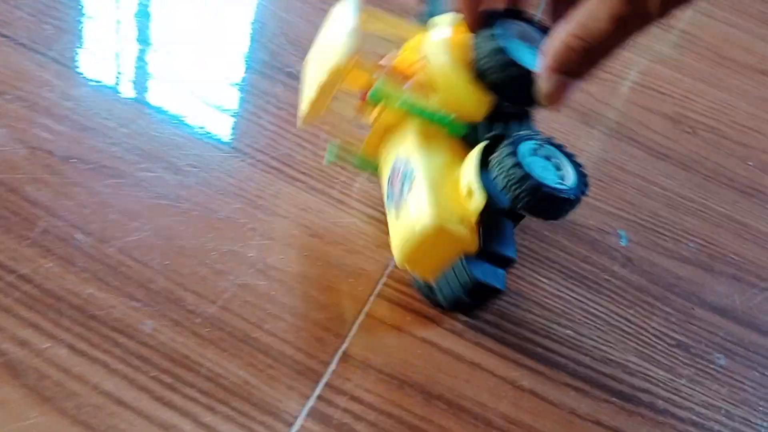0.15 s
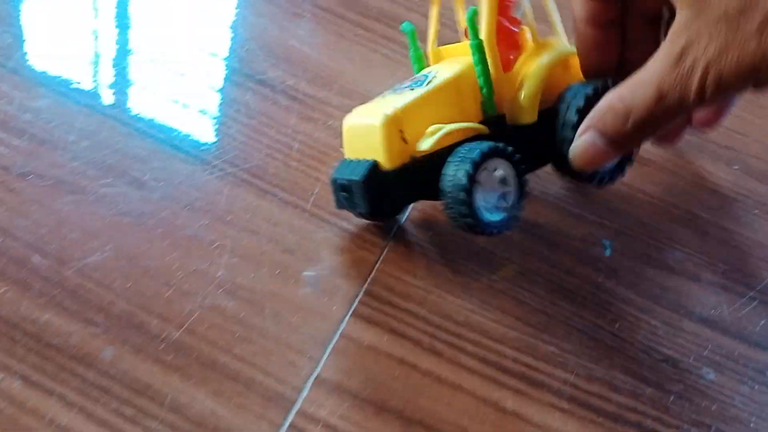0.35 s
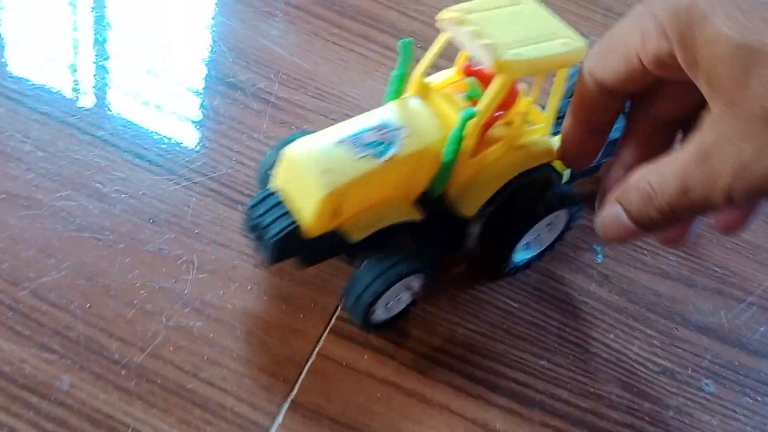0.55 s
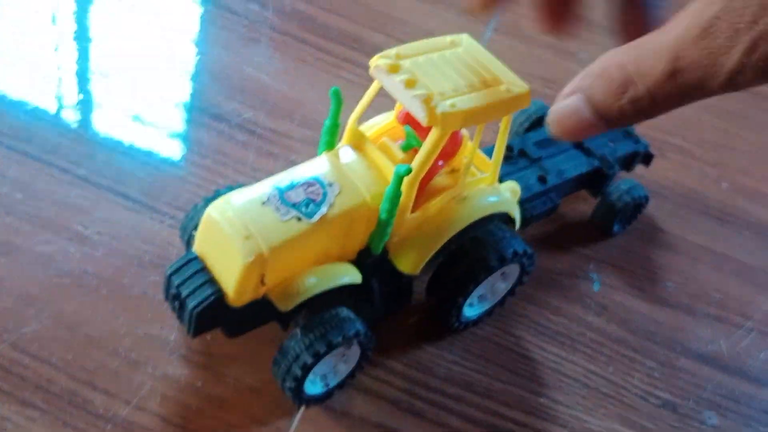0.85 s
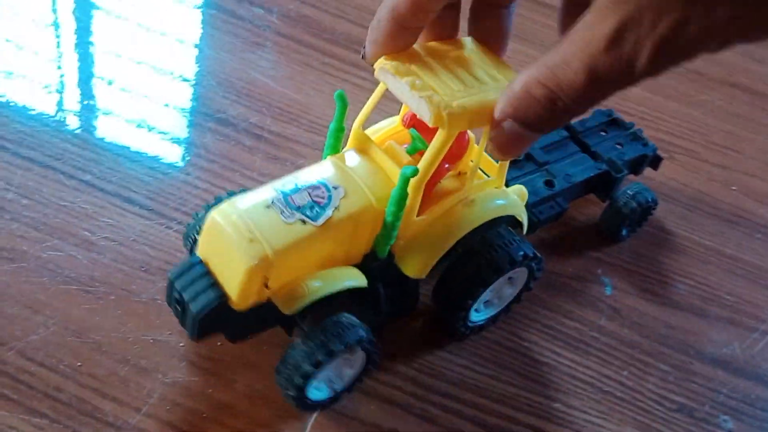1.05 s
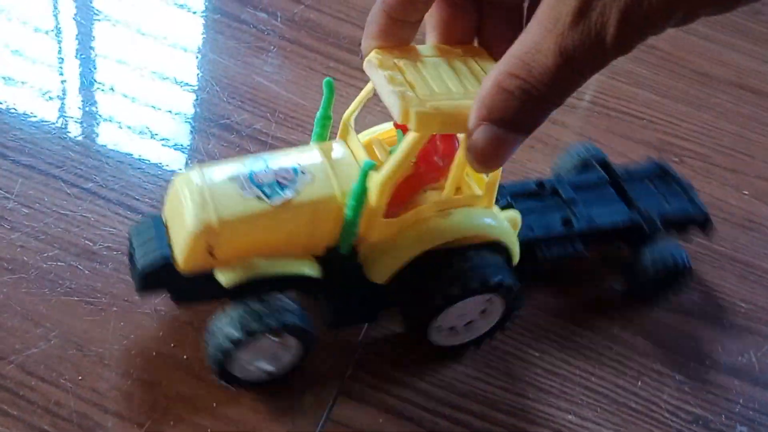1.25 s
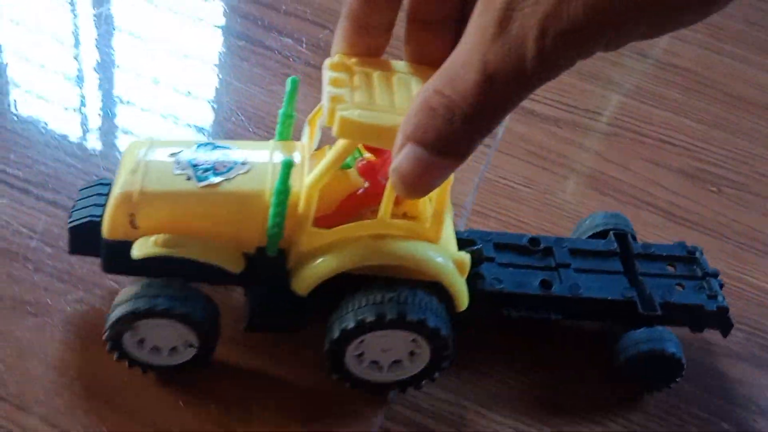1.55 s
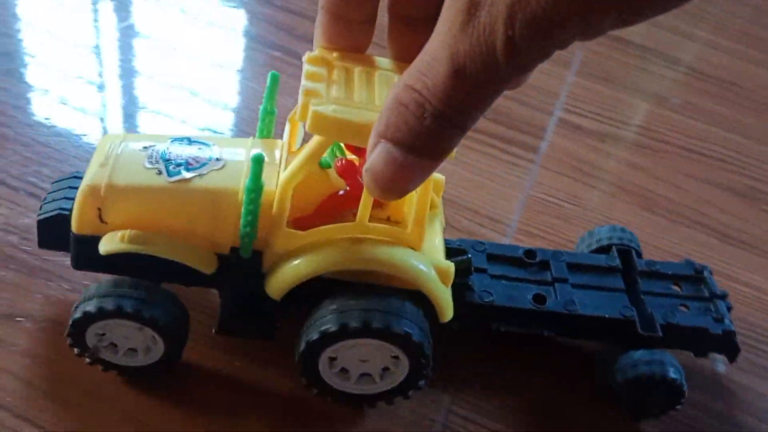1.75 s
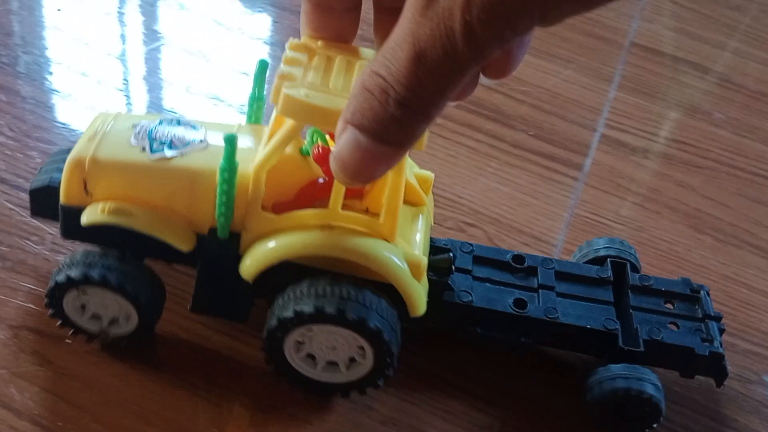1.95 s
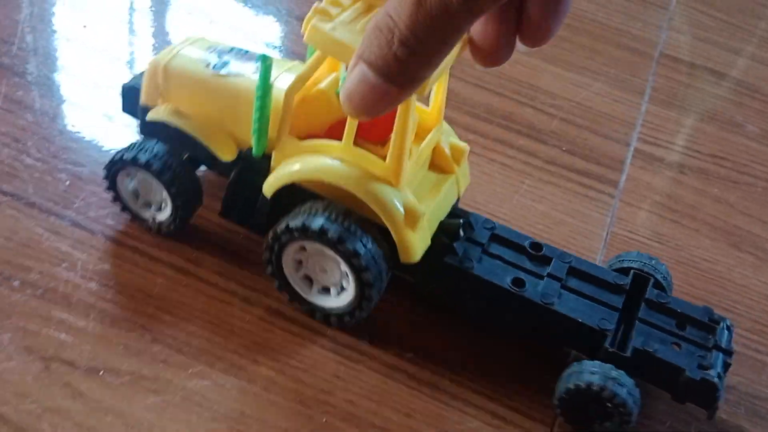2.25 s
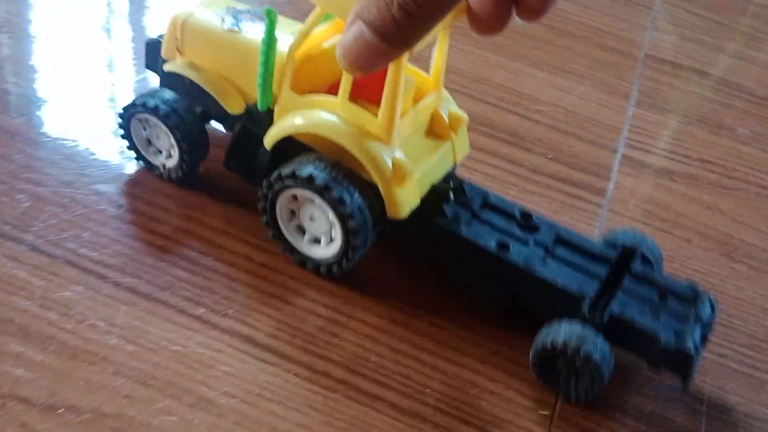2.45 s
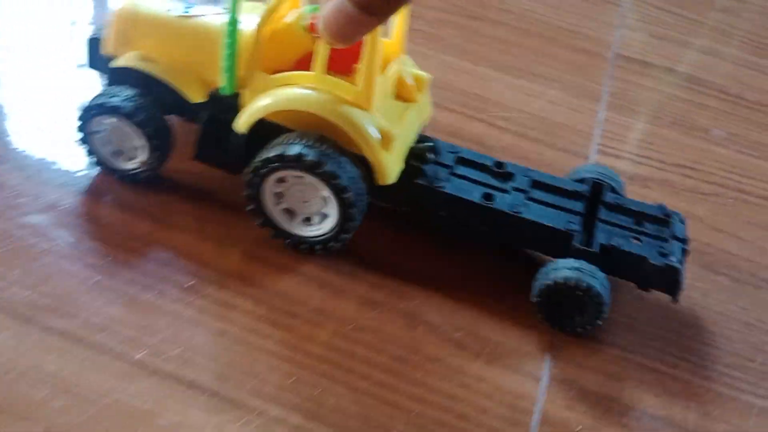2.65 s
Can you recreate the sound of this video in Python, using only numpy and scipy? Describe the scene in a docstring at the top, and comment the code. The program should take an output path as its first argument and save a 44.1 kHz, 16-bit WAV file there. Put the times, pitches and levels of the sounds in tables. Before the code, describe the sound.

A toy tractor clatters upright, then its plastic wheels scrape along a wooden floor.

```python
"""On the wooden floor of a quiet room, a hollow plastic toy tractor is swung upright, comes to rest
and is pushed along with its trailer, heard from close by. Friction at the hard wheels is a train of
tiny slips that excite the modes of the shell. The tread makes the scrape chatter, and rolling bumps
drive a low rumble in floor and wheels. Stick-slip oscillation gives brief squeals, as when the toy
stops, and loose parts click and knock."""
import sys
import numpy as np
from scipy import signal
from scipy.fft import rfft, irfft
from scipy.io import wavfile
from scipy.ndimage import uniform_filter1d

SR = 44100
rng = np.random.default_rng(int(sys.argv[2]) if len(sys.argv) > 2 else 0)


def master_out(mix):
    """Clip the mix to full scale and print it as 16-bit PCM to the path in sys.argv[1]."""
    frames = np.transpose(np.atleast_2d(mix))
    ceiling = np.clip(frames, -1, 1)
    pcm = np.round(ceiling * 32767).astype(np.int16)
    wavfile.write(sys.argv[1], SR, pcm)


N = 123479
T = np.arange(N) / SR
HZ = np.fft.rfftfreq(2 * N, 1 / SR)

# Spectrum of the still room: frequency_hz, gain_db
AIR_SPECTRUM = [(25, -15), (60, 3), (110, -5), (250, -4), (450, -4), (800, 1.5), (1300, -10), (1900, -21),
                (2400, -19), (3300, -26), (4600, -12), (5500, -34), (6800, -26), (8000, 0), (9500, -9),
                (12500, -7), (15500, -28)]
# Envelopes of the rolling rumble: time_s, floor_db, wheel_db
RUMBLE_LEVELS = [(0, -64, -64), (.1, -60, -70), (.21, -54, -58), (.26, -66.5, -72), (.5, -62.5, -72),
                 (.56, -72, -76), (.62, -64.5, -71), (.72, -68, -79), (.8, -63, -79), (.86, -72, -79),
                 (.97, -79, -79.5), (1.1, -63.5, -72), (1.43, -66, -70), (1.53, -56.5, -64.5),
                 (1.62, -46.5, -58.5), (1.66, -49.5, -65), (1.72, -46, -49), (1.77, -70, -45),
                 (1.9, -65, -57), (2.0, -57, -51.5), (2.1, -63.5, -52.5), (2.27, -63, -50.5),
                 (2.33, -73, -57), (2.38, -59, -57.5), (2.45, -64, -65.5), (2.5, -55, -55.5),
                 (2.56, -61, -60.5), (2.7, -49, -50.5), (2.8, -50.5, -59)]
# Low resonances of floor and wheels: frequency_hz, half_width_hz, gain_db
FLOOR_MODES = [(103.8, 6.8, 6.5), (127, 7, -2), (148.6, 11, -2.5), (177, 41, -6)]
WHEEL_MODES = [(229.6, 8.6, 4.5), (259, 37, -3), (314.7, 22, 3), (380, 21, -13.5), (495, 24, -5),
               (620, 16, -14)]
# Envelope of the dry crackle as the wheels twist on the floor: time_s, level_db
CRACKLE_LEVELS = [(0, -55), (.05, -54.5), (.12, -58), (.2, -47), (.33, -52), (.5, -51), (.62, -60),
                  (.75, -72.5), (.95, -82), (1.07, -76), (1.11, -61), (1.15, -60), (1.22, -64), (1.35, -62),
                  (1.5, -50.5), (1.65, -70)]
# Clicks of loose parts: start_s, level_db, tilt_db_per_octave
CLICKS = [(.002, -32.5, -1), (.0355, -45, 9), (0.0664, -30.5, 15), (0.098, -33, 13), (.117, -31, 14),
          (0.131, -33, -6), (0.1506, -28, 16), (0.168, -25, 18), (.186, -29, 9), (.204, -31, 5),
          (0.2336, -21, -8), (.2878, -30, -3), (.3078, -29, 9), (.3692, -33, 1), (.4362, -30, 1),
          (0.5989, -31.5, -6.5), (0.651, -46, 10), (1.0890, -28.5, -3.5), (1.1797, -41, 6),
          (1.396, -31.5, -4), (1.430, -32, -6)]
# Knocks of wheels and axles: start_s, level_db, t60_s, tilt_db_per_octave
KNOCKS = [(0.0996, -25.5, 0.018, 1), (.2348, -18.5, .014, 5.5), (.6005, -41, 0.018, 0),
          (0.6172, -21, .028, -5), (0.655, -32, 0.038, -6), (.779, -36, .05, -11), (1.020, -39, 0.033, -8),
          (1.1998, -36, 0.012, -12)]
# Spectra of grit hiss, crackle, clicks and knocks: frequency_hz, gain_db
HISS_SPECTRUM = [(3500, -38), (5000, -11), (5450, -6.5), (6200, -4), (6900, 0), (8400, -1), (9300, -10.5),
                 (10200, -8), (11800, -15.5), (13000, -11.5), (13900, -21), (15300, -20.5)]
CRACKLE_SPECTRUM = [(2000, -21), (5200, -18), (6200, -8), (7400, 2), (9300, -7), (10300, -5), (13000, -9),
                    (14000, -17), (15400, -5)]
CLICK_SPECTRUM = [(1500, -30), (3000, 3), (4500, -24), (6000, -5.5), (7600, 5.5), (9300, -1.5), (11000, -2),
                  (13000, -7), (15500, -19)]
KNOCK_SPECTRUM = [(40, -38), (120, -19), (450, -34), (780, -9), (1350, 1.5), (1900, -3.5), (2700, -4),
                  (4000, -23), (6000, -21), (15000, -43)]
# Squeals of a sliding wheel: start_s, length_s, mid_pitch_hz, glide_hz_per_s, half_width_hz, level_db
SQUEALS = [(0.012, 0.29, 780, -1, 39, -50.5), (.12, 0.12, 1145, 3, 20, -42.5),
           (0.29, 0.19, 930, 1.5, 32, -54.5), (0.28, .07, 520, 2, 57, -64.5),
           (0.64, 0.18, 3780, -600, 100, -75), (0.839, 0.078, 1650, 1098.5, 30, -60.5),
           (0.77, 0.17, 3370, -500, 98, -79), (0.88, 0.09, 4650, -300, 70, -83),
           (0.886, 0.17, 2270, -2000, 70, -74.5), (1.008, 0.29, 780.6, -3, 17, -52.5),
           (1.24, 0.23, 806, 0, 19, -53), (1.678, 0.085, 2400, -0.5, 98, -37.5),
           (1.8, 0.38, 1532, 200.5, 127, -33.5), (2.113, 0.062, 2900, 1.5, 170, -47),
           (2.566, .1, 2094, 1, 20, -42.5)]
# Envelope of the shell's hollow low range: time_s, level_db
HOLLOW_LEVELS = [(0.0, -75), (0.04, -62.5), (0.13, -41), (0.54, -78), (0.63, -52), (0.81, -55.5),
                 (0.89, -87), (0.96, -74), (1.07, -56), (1.46, -51), (1.5, -54.5), (1.6, -47), (1.64, -49),
                 (1.76, -42), (1.85, -49.5), (1.86, -42.5), (2.09, -38.5), (2.11, -49.5), (2.21, -45),
                 (2.52, -58.5), (2.56, -49.5), (2.73, -47), (2.78, -51), (2.8, -65)]
# Envelopes of the shell's upper ranges: time_s, middle_db, treble_db
SCRAPE_LEVELS = [(0, -53.5, -44), (.05, -48, -60), (.09, -43, -42), (.17, -43, -37), (.25, -45, -38),
                 (.34, -49, -41.5), (.43, -47, -42), (.49, -45, -38.5), (.545, -44.5, -42.5),
                 (.585, -59, -54.5), (.612, -53, -47.5), (.64, -49, -49.5), (.67, -49, -55),
                 (.72, -47.5, -59.5), (.77, -64, -64), (.81, -56, -72), (.88, -64, -78), (.93, -84, -82),
                 (.985, -67, -88), (1.01, -53.5, -69), (1.08, -48.5, -56.5), (1.19, -47, -54),
                 (1.27, -49, -47), (1.39, -47.5, -47.5), (1.43, -39, -43), (1.5, -44.5, -40.5),
                 (1.55, -40.5, -42.5), (1.66, -41, -42), (1.72, -41.5, -34.5), (1.82, -34, -34),
                 (1.89, -51, -35), (1.94, -59, -34.5), (2.13, -43, -33), (2.25, -37.5, -35.5),
                 (2.35, -41, -38.5), (2.39, -41, -37), (2.48, -42.5, -40.5), (2.64, -38.5, -39),
                 (2.8, -46, -42)]
# Scrape spectra with the toy tilted, creeping, pushed upright and veering away: frequency_hz, gain_db
TILTED_SPECTRUM = [(300, -27), (560, -15.5), (760, -2), (930, -1.5), (1350, 5.5), (1700, 1), (1950, -6.5),
                   (2400, -6), (2850, -6.5), (3250, -14.5), (3950, -13), (4400, -22.5), (5200, -20)]
CREEPING_SPECTRUM = [(300, -21.5), (560, -19.5), (740, -2), (930, -8.5), (1250, 6.5), (1470, 0),
                     (1850, -9.5), (2350, -10), (2650, -15), (3250, -18.5), (3550, -28.5), (4050, -25),
                     (4400, -42), (5200, -62)]
PUSHED_SPECTRUM = [(300, -35), (560, -29.5), (720, -10.5), (920, -13), (1040, -7.5), (1230, -0.5),
                   (1500, 1.5), (1820, -5.5), (2050, -8.5), (2290, -3.5), (2540, -5), (2800, -11.5),
                   (3200, -11.5), (3550, -16), (4100, -13.5), (4450, -21), (5200, -19.5)]
VEERING_SPECTRUM = [(300, -45), (560, -32), (730, -6), (950, -12.5), (1200, -3), (1500, 0.5), (1820, -6.5),
                    (2080, -4.5), (2350, -9), (2850, -5.5), (3200, -13), (3600, -16.5), (4050, -15.5),
                    (4450, -21), (5200, -18)]


def amp(db):
    """Amplitude ratio of a level in decibels."""
    return 10 ** (np.asarray(db) / 20)


def unit(x):
    """Normalisation to an rms of 1."""
    return x / np.sqrt(np.mean(x ** 2) + 1e-20)


def curve(rows, column=1):
    """Linear interpolation of one column of a time table at every sample."""
    rows = np.array(rows)
    return np.interp(T, rows[:, 0], rows[:, column])


def shape(spectrum, hz=HZ):
    """Gain of a spectrum table, interpolated over logarithmic frequency."""
    table_hz, db = np.transpose(spectrum)
    return amp(np.interp(np.log(hz + 1), np.log(table_hz + 1), db))


def filtered(x, gain):
    """Linear filtering as multiplication of the spectrum."""
    return irfft(rfft(x, 2 * N) * gain)[:N]


def band(low_hz, high_hz):
    """Magnitude response of a steep band-pass."""
    return 1 / np.sqrt((1 + (low_hz / (HZ + 1)) ** 16) * (1 + (HZ / high_hz) ** 16))


def resonance(hz, half_width_hz):
    """Lorentzian response, falling to half amplitude at half_width_hz from the peak."""
    return 1 / (1 + ((HZ - hz) / half_width_hz) ** 2)


def slips(per_s, spread_db):
    """A Poisson train of tiny impacts, a few much larger than the rest."""
    size = amp(spread_db * np.minimum(rng.exponential(1, N), 4))
    return unit(size * rng.choice([-1, 1], N) * (rng.random(N) < per_s / SR))


def ring(x, t60_s):
    """Dense, equally damped modes have an impulse response of exponentially decaying noise."""
    t = T[:SR // 3]
    response = rng.standard_normal(len(t)) * 1000. ** (-t / t60_s)
    return signal.fftconvolve(x, response / np.linalg.norm(response))[:N]


def impact_envelope(t, t60_s, attack_s=0.00091, hold_s=0.0011):
    """A struck body's vibration builds quickly, then damping makes it decay exponentially."""
    return (1 - np.exp(-t / attack_s)) * 1000. ** (-np.maximum(t - hold_s, 0) / t60_s)


def add_impact(mix, start_s, db, envelope, gain):
    """An impact excites crowded plastic modes, added to the mix as a burst of coloured noise."""
    noise = irfft(rfft(rng.standard_normal(len(envelope))) * gain)
    burst = amp(db) * unit(noise) * envelope / 2
    part = mix[round(start_s * SR):][:len(burst)]
    part += burst[:len(part)]


def room_air(level_db=-72):
    """The ambient sound of the room is stationary coloured noise."""
    return amp(level_db) * unit(filtered(rng.standard_normal(N), shape(AIR_SPECTRUM)))


def rumble(modes, level_db):
    """Forced vibration: random rolling bumps drive a set of low resonances."""
    gain = sum(amp(db) * resonance(hz, half_width_hz) for hz, half_width_hz, db in modes)
    return amp(level_db) * unit(filtered(slips(per_s=1500, spread_db=3.5), gain))


def tread_chatter(blocks_per_s=105, jitter=0.35, depth=0.11):
    """Amplitude modulation: tread blocks meet the floor unevenly and make the friction flutter."""
    wander = unit(uniform_filter1d(rng.standard_normal(N), size=500))
    cycles = np.cumsum(blocks_per_s * (1 + jitter * wander)) / SR
    return 1 + depth * np.cos(2 * np.pi * cycles)


def grit_hiss(chatter, exponent=1.416):
    """Shot noise of grit under the wheels, growing as a power of the scrape's treble amplitude."""
    level_db = -42 + exponent * (curve(SCRAPE_LEVELS, column=2) + 34.5)
    grains = slips(per_s=16000, spread_db=3.5) * chatter
    return amp(level_db) * unit(filtered(grains, shape(HISS_SPECTRUM)))


def wheel_crackle(energy_decay_s=0.0007):
    """The twisting wheel's edge releases energy in sparse snaps, each a decaying burst of noise."""
    snaps = slips(per_s=900, spread_db=3.3)
    energy = signal.fftconvolve(snaps ** 2, np.exp(-T[:SR // 50] / energy_decay_s))[:N]
    bursts = np.sqrt(abs(energy)) * rng.standard_normal(N)
    return amp(curve(CRACKLE_LEVELS)) * unit(filtered(bursts, shape(CRACKLE_SPECTRUM)))


def loose_parts(samples=4096):
    """Free vibration after impact: small parts click brightly, wheels and axles give duller knocks."""
    out, t, hz = np.zeros(N), T[:samples], np.fft.rfftfreq(samples, 1 / SR)
    click_envelope = impact_envelope(t, t60_s=0.011) + amp(-19) * impact_envelope(t, t60_s=0.06)
    for start_s, db, tilt in CLICKS:
        octaves = np.log2(np.maximum(hz, 2000) / 8000)
        gain = shape(CLICK_SPECTRUM, hz) * amp(tilt * octaves)
        add_impact(out, start_s, db, click_envelope, gain)
    for start_s, db, t60_s, tilt in KNOCKS:
        octaves = np.log2(np.maximum(hz / 1400, 1))
        gain = shape(KNOCK_SPECTRUM, hz) * amp(tilt * octaves)
        add_impact(out, start_s, db, impact_envelope(t, t60_s), gain)
    return out


def wheel_squeals():
    """Stick-slip oscillation: a sliding wheel briefly feeds one gliding resonance."""
    out = np.zeros(N)
    for start_s, length_s, hz, glide, half_width_hz, db in SQUEALS:
        progress = np.clip((T - start_s) / length_s, 0, 1)
        swell = np.sqrt(np.sin(np.pi * progress).clip(0))
        cycles = np.cumsum(hz + glide * (T - start_s - length_s / 2)) / SR
        # Slow random changes of amplitude and phase broaden the spectral line.
        real, imag = (filtered(rng.standard_normal(N), resonance(0, half_width_hz)) for _ in range(2))
        waver = real + 1j * imag
        tone = (waver / abs(waver) ** 0.5 * np.exp(2j * np.pi * cycles)).real
        out += amp(db) * unit(tone * swell) * np.sqrt(length_s / T[-1])  # db is the rms over length_s
    return out


def shell_vibration(force, mode_sets=15, t60_s=0.082, ring_gain=0.58):
    """Modal response of the shell: successive sets of modes crossfade as the toy moves."""
    position = T / T[-1] * (mode_sets - 1)
    weights = (np.cos(np.pi / 2 * np.clip(position - k, -1, 1)) for k in range(mode_sets))
    return force + ring_gain * sum(ring(force * weight, t60_s) for weight in weights)


def wheel_scrape(chatter, creep_s=0.58, push_s=1.287, veer_s=2.17, fade_s=0.071):
    """Source and filter: frictional slips ring the shell, coloured anew in each stage of the motion."""
    shell = shell_vibration(slips(per_s=9000, spread_db=2.5) * chatter)
    # Each crossfade is an angle that passes through a quarter turn.
    creep, push, veer = (np.pi / 2 * np.clip((T - s) / fade_s + 0.5, 0, 1)
                         for s in (creep_s, push_s, veer_s))
    stages = [(TILTED_SPECTRUM, np.cos(creep)),
              (CREEPING_SPECTRUM, np.sin(creep) * np.cos(push)),
              (PUSHED_SPECTRUM, np.sin(push) * np.cos(veer)),
              (VEERING_SPECTRUM, np.sin(veer))]
    bands = [(band(324, 1020), curve(HOLLOW_LEVELS)),
             (band(1173, 1700), curve(SCRAPE_LEVELS)),
             (band(1950, 4820), curve(SCRAPE_LEVELS, column=2))]
    return sum(share * amp(db) * unit(filtered(shell, shape(spectrum) * gain))
               for spectrum, share in stages for gain, db in bands)


def scene():
    """Superposition of the toy's direct sound, its faint reverberation and the still air."""
    chatter = tread_chatter()
    toy = wheel_scrape(chatter) + grit_hiss(chatter) + wheel_crackle() + wheel_squeals() + loose_parts()
    toy += rumble(FLOOR_MODES, curve(RUMBLE_LEVELS))
    toy += rumble(WHEEL_MODES, curve(RUMBLE_LEVELS, column=2))
    return (room_air() + toy + amp(-14) * ring(toy, t60_s=0.16))[None]


def record(dry, notch_db=-18, notch_hz=4887, cutoff_hz=15560):
    """Frequency response of the microphone: a narrow notch, followed by a steep low-pass."""
    notched = filtered(dry[0], amp(notch_db * resonance(notch_hz, half_width_hz=230)))
    low_pass = signal.firwin(511, cutoff_hz, window=("kaiser", 9), fs=SR)
    return signal.oaconvolve(notched, low_pass, "same")[None]


dry = scene()
out = record(dry)
master_out(out)
```